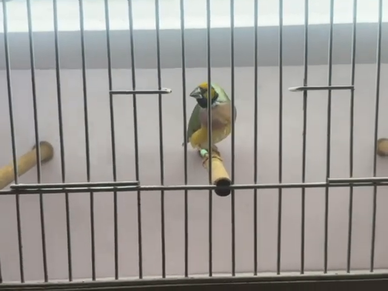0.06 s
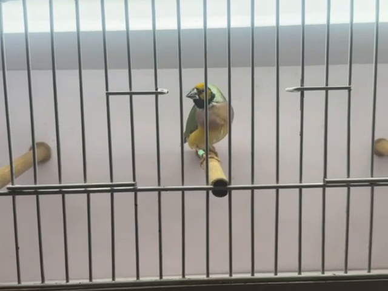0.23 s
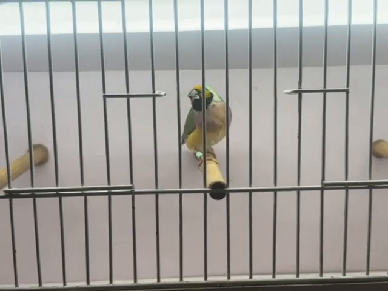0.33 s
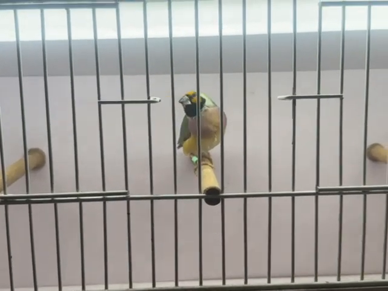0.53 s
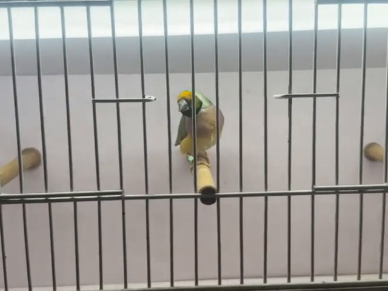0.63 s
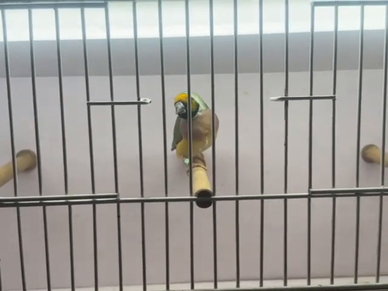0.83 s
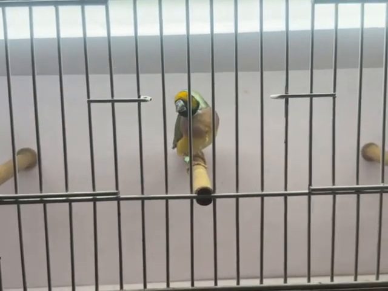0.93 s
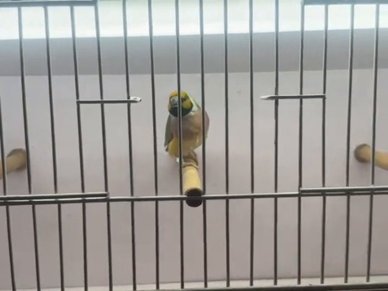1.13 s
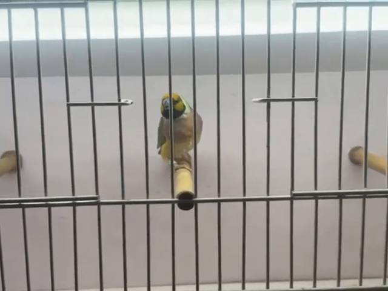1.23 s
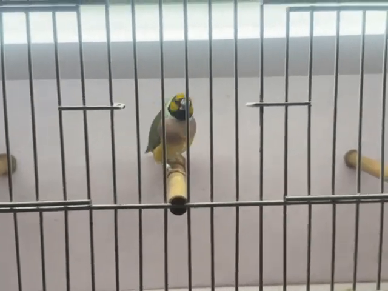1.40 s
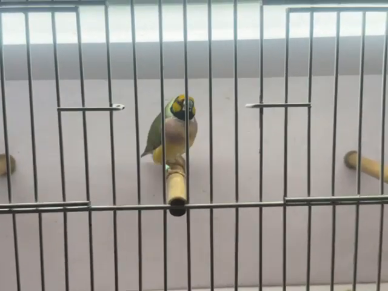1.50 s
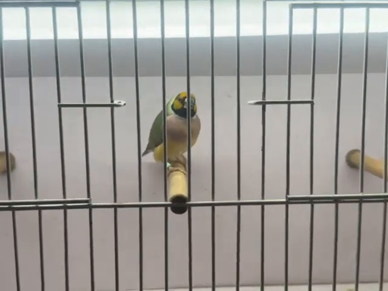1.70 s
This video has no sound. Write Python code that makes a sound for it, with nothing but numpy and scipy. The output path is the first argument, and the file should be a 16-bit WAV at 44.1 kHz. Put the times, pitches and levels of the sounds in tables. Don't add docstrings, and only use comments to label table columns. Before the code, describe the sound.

Near the microphone a finch utters two tiny notes and a bright rasping chirp; a more distant, echoing bird follows with evenly spaced down-swept whistles, while a machine drones low and uneven behind soft room air.

```python
import sys
import numpy as np
from scipy import signal
from scipy.io import wavfile
from scipy.ndimage import uniform_filter1d, minimum_filter1d

SR = 44100
rng = np.random.default_rng(int(sys.argv[2]) if len(sys.argv) > 2 else 0)


def materialize(psi):
    bounded = np.clip(np.atleast_2d(psi).T, -1, 1)
    quanta = np.round(bounded * 32767).astype(np.int16)
    wavfile.write(sys.argv[1], SR, quanta)


def gain_from_db(level_db):
    decades = np.asarray(level_db, float) / 20
    return 10 ** decades


N = 77175

# (time [s], pitch [Hz], level [dB])
INTRO_NOTE = [(0.072, 2225, -44), (0.083, 2297, -29), (0.098, 2235, -24.5), (0.108, 2450, -26),
              (0.12, 2483, -31), (0.131, 2251, -22), (0.138, 2116, -21.5), (0.143, 2050, -78)]
BRIDGE_NOTE = [(0.11, 2037, -46), (0.117, 2077, -32), (0.129, 2061, -31.5), (0.138, 2008, -34),
               (0.154, 2155, -20), (0.159, 2157, -27), (0.166, 1970, -63)]
HIGH_VOICE = [(0.136, 3762, -27.5), (0.151, 3707, -16.5), (0.173, 3680, -25), (0.189, 3720, -15.5),
              (0.203, 3988, -15), (0.225, 4122, -18.5), (0.293, 4198, -17), (0.328, 4190, -39.5),
              (.342, 4300, -75)]
LOW_VOICE = [(0.135, 2538, -40), (0.147, 2598, -28.5), (0.164, 2657, -17), (0.177, 2703, -32.5),
             (0.193, 2900, -21), (0.231, 3167, -21.5), (0.296, 3258, -19.5), (0.371, 3234, -40.5),
             (0.384, 3260, -36.5)]
INTRO_HARMONICS = [-4, -6, -25, -16, -36]
BRIDGE_HARMONICS = [3, 2, 4, -5.5, -2]
HIGH_HARMONICS = [0, -1.1, -19]
LOW_HARMONICS = [0, -1, -7.5]
# (multiple of low [-], multiple of high [-], level [dB])
SUM_TONES = [
    (1, 1, -17),
    (1, 2, -27),
    (2, 1, -23),
]
OVERTONE_SLOPES = [1, -150, -93, -29]
FLUTTER_PITCH_DIPS = [.01, .02, .1, .13]
# (time [s], share [-])
FLUTTER_EFFORT = [(.14, .3), (.165, 0.471), (.2, 0.94), (.31, 0.74), (.35, 0.14)]

# (time [s], level [dB], top pitch [Hz], accent on the first instant [dB])
FALLING_NOTES = [
    (0.442, -24.5, 5390, 2),
    (0.603, -18, 5253, 5.5),
    (0.76, -17, 5160, 1.5),
    (0.917, -20, 5390, -3),
    (1.081, -17.5, 5200, 7.5),
    (1.241, -17, 5310, 5),
    (1.408, -16.5, 5110, -5),
    (1.584, -23, 4220, -4),
]
# (frequency [Hz], level [dB])
FAR_THROAT_RESPONSE = [(2100, -21), (2300, -21), (2900, -23), (3450, -27), (3650, -4), (4500, -6),
                       (5300, -13), (6200, -20)]
# (time [s], duration [s], pitch [Hz], level [dB])
FAINT_PEEPS = [(.455, .03, 7400, -50), (.45, .015, 6300, -51), (.93, .012, 6300, -49),
               (.736, .012, 3950, -52), (.74, .02, 7500, -56), (.78, .012, 6200, -55),
               (.822, .014, 4100, -43), (.832, .012, 3800, -43), (.846, .012, 4200, -45),
               (.83, .02, 5900, -54), (.845, .015, 2250, -50), (.925, .02, 6800, -54),
               (.941, .016, 6050, -45), (1.115, .04, 7000, -55), (1.546, .032, 4230, -47),
               (1.62, .022, 2220, -49), (1.687, .01, 2900, -50), (1.548, .012, 3150, -53)]
# (time [s], level [dB])
CLAW_TICKS = [
    (0.801, -37),
    (.81, -58),
    (1.691, -68),
]

STROKE_MULTIPLES = [4, 5, 6, 7, 8, 9, 11, 12, 13, 15]
# (loaded level [dB], coasting level [dB], beat rate [Hz], loudest time [s], beat depth [0-1])
HARMONIC_BEATS = [(-22, -41, 0.23, 1.08, 0.03), (-27.5, -27.5, 0.6, 1.06, .3),
                  (-30, -36.5, 1.16, 0.4, 0.13), (-40, -35.5, 2.5, 0.096, 1), (-33, -48, 1.49, 0.796, 0.77),
                  (-47.5, -72, 0.98, 0.28, 0), (-60, -60, 0.27, 1.1, 1), (-50.5, -60, 0.88, 0.97, 1),
                  (-54.5, -65, 0.58, 0.48, 0.2), (-50, -50.5, 0.73, 0.74, 0.47)]
# (time [s], stroke rate [Hz])
STROKE_RATE = [(0, 18.4), (.2, 18.5), (.27, 19), (.33, 20.4), (.5, 20.3), (.575, 19), (.63, 18.8),
               (1.1, 18.8), (1.2, 19.2), (1.31, 19.7), (1.4, 19.1), (1.55, 19.5), (1.75, 18.6)]
# (time [s], load [0-1])
MACHINE_LOAD = [(0, 0.52), (.12, 1), (.2, 0.93), (.27, 0.48), (.34, 0.28), (.42, .03), (.5, 0.23), (.59, 0),
                (.63, 0.98), (.75, 0.92), (1.1, .97), (1.2, 0.84), (1.32, 0.4), (1.4, 0.8), (1.48, 0.58),
                (1.55, 0.38), (1.63, 0.36), (1.75, 0.4)]

# (frequency [Hz], level [dB])
AIR_SPECTRUM = [(100, -31), (170, -1), (388, -16), (1260, -15.5), (2180, -23.5), (2430, -31), (2930, -20),
                (3590, -42.5), (7000, -45.5), (9100, -77), (15400, -120)]
# (time [s], level [dB])
RUSTLE_LEVEL = [(0.0, -53), (0.13, -43.5), (0.232, -93), (0.262, -52), (0.38, -53), (0.458, -49.5),
                (1.09, -53.5), (1.218, -54), (1.466, -46.5), (1.75, -50)]
# (frequency [Hz], level [dB])
RUSTLE_SPECTRUM = [(2000, 8), (4000, -2), (6000, -0.5), (9000, -6), (11200, -10.5), (12000, -29)]
# (time [s], width [s], frequency [Hz], level [dB])
BUILDING_KNOCKS = [
    (0.81, 0.25, 760, -51),
    (1.2, 0.21, 596, -60),
    (1.66, 0.18, 540, -53),
    (1.4, 0.17, 530, -49.5),
    (1.515, 0.23, 279, -51),
    (0.37, 0.035, 290, -47),
]
# (frequency [Hz], 60 dB decay time [s])
NEAR_DECAY = [(2000, 0.18), (4000, 0.19), (7000, 0.15), (12000, 0.13)]
FAR_DECAY = [(2000, 0.12), (3000, 0.44), (4000, 0.31), (7000, 0.23)]


def evened(x):
    return x / np.sqrt(np.mean(x ** 2) + 1e-20)


def read(points, hz):
    f, value = np.transpose(points)
    return np.interp(np.log(hz + 1), np.log(f + 1), value)


def curve_at(points, t):
    return np.interp(t, *np.transpose(points))


def drift(size):
    return evened(uniform_filter1d(uniform_filter1d(rng.standard_normal(N), size), size))


def band(x, lo_hz, hi_hz):
    return signal.sosfilt(signal.butter(2, [lo_hz, min(hi_hz, .45 * SR)], "band", fs=SR, output="sos"), x)


def steep_noise(lo_hz, hi_hz):
    return evened(band(band(rng.standard_normal(N), lo_hz, hi_hz), lo_hz, hi_hz))


def syrinx_half(curve, pitch_dip, flutter):
    s, hz, db = np.transpose(curve)
    t = np.arange(N) / SR
    pitch = np.interp(t, s, hz) * (1 + .003 * drift(size=60) - pitch_dip * flutter)
    phase = 2 * np.pi * np.cumsum(pitch) / SR
    level_db = np.interp(t, s, db, -140, -140) + 3 * drift(size=200) - 11 * flutter
    return phase, gain_from_db(level_db) * np.sqrt(2)


def finch():
    out, t = np.zeros(N), np.arange(N) / SR
    flutter_hz = 100.18 * (1 + 0.11 * drift(size=400))
    flutter = (.5 + .5 * np.cos(2 * np.pi * np.cumsum(flutter_hz) / SR)) ** 4
    flutter = flutter * curve_at(FLUTTER_EFFORT, t)
    curves = (INTRO_NOTE, BRIDGE_NOTE, HIGH_VOICE, LOW_VOICE)
    tones = (INTRO_HARMONICS, BRIDGE_HARMONICS, HIGH_HARMONICS, LOW_HARMONICS)
    voices = [syrinx_half(curve, dip, flutter) for curve, dip in zip(curves, FLUTTER_PITCH_DIPS)]
    for (phase, gain), tone, slope, curve in zip(voices, tones, OVERTONE_SLOPES, curves):
        tilt_db = slope * (t - curve[0][0])
        for k, db in enumerate(tone):
            patchy_db = 4 * drift(size=500) if k else 0
            out += gain * gain_from_db(db + k * tilt_db + patchy_db) * np.sin((k + 1) * phase)
    (high, high_gain), (low, low_gain) = voices[2:]
    for m, n, db in SUM_TONES:
        sum_tone = np.sin(m * low + n * high)
        out += np.sqrt(high_gain * low_gain) * gain_from_db(db + 4 * drift(size=300)) * sum_tone
    loud = high_gain + low_gain
    out += gain_from_db(-17) * loud * steep_noise(2900, 3800)
    out += gain_from_db(-22) * voices[0][1] * steep_noise(4800, 8000)
    out += gain_from_db(-25) * loud * steep_noise(6400, 11000)
    return out + gain_from_db(-30) * loud * evened(band(rng.standard_normal(N), 7900, 9100))


def far_birds():
    top_hold_s, fall_s, end_hold_s = .006, .022, 0.013
    aim_hz, end_hz = 1900, 2213
    whistles, peeps = np.zeros(N + SR), np.zeros(N + SR)
    burr, flutter_db = .045 * drift(size=24), 2.5 * drift(size=60)
    for s, db, top_hz, accent_db in FALLING_NOTES:
        start = round(s * SR)
        glide_s = fall_s * np.log((top_hz - aim_hz) / (end_hz - aim_hz))
        t = np.arange(0, top_hold_s + glide_s + end_hold_s, 1 / SR)
        hz = aim_hz + (top_hz - aim_hz) * np.exp((top_hold_s - t) / fall_s)
        hz = np.clip(hz, end_hz, top_hz)
        roughness = (hz / top_hz) ** 2 * np.minimum(t / top_hold_s, 1)
        hz = hz * (1 + burr[start:][:len(t)] * roughness)
        effort_db = np.where(t < top_hold_s, accent_db, flutter_db[start:][:len(t)])
        shape = np.clip(np.minimum(t / .002, (t[-1] - t) / .006), 0, 1)
        gain = shape * gain_from_db(db - 10 + effort_db + read(FAR_THROAT_RESPONSE, hz))
        whistles[start:][:len(t)] += gain * np.sin(2 * np.pi * np.cumsum(hz) / SR)
    for s, length, hz, db in FAINT_PEEPS:
        start, t = round(s * SR), np.arange(0, length, 1 / SR)
        wobble = 1 + .5 * burr[start:][:len(t)]
        tone = np.sin(2 * np.pi * hz * np.cumsum(wobble) / SR)
        peeps[start:][:len(t)] += gain_from_db(db) * np.sin(np.pi * t / length) * tone
    return whistles[:N], gain_from_db(2) * peeps[:N]


def cage():
    t, noise = np.arange(N) / SR, evened(band(rng.standard_normal(N), 3400, 12400))
    return noise * sum(gain_from_db(db - 60 * np.maximum(t - s, 0) / 0.021) * (t > s) for s, db in CLAW_TICKS)


def machine_hum():
    t = np.arange(N) / SR
    turns, load = np.cumsum(curve_at(STROKE_RATE, t)) / SR, curve_at(MACHINE_LOAD, t)
    turns = turns - turns[round(.951 * SR)]
    pole, out = np.exp(-np.pi * 7 / SR), np.zeros(N)
    for k, (loaded_db, coast_db, beat_hz, peak_s, depth) in zip(STROKE_MULTIPLES, HARMONIC_BEATS):
        fuzz = signal.lfilter([1], [1, -2 * pole, pole ** 2], rng.standard_normal((2, 2 * N)))[:, N:]
        fuzz = np.array([1, 1j]) @ evened(fuzz)
        swell = 1 + depth * np.cos(2 * np.pi * beat_hz * (t - peak_s)) + gain_from_db(-17) * fuzz
        lead_turns = .25 * (k > 5)
        level = gain_from_db(coast_db + load * (loaded_db - coast_db))
        out -= level * (swell * np.exp(2j * np.pi * (k * turns + lead_turns))).real
    rumble = evened(band(band(rng.standard_normal(N), 67.6, 126.3), 49, 152))
    return out + gain_from_db(-37.5) * rumble


def air(colour, patchy_db):
    frames, hz = N // 128 + 6, np.fft.rfftfreq(512, 1 / SR)
    a, b, patches = rng.standard_normal((frames, 257, 3)).T
    patches = evened(uniform_filter1d(uniform_filter1d(patches, 10, 0), 24, 1))
    z = (a + 1j * b) * gain_from_db(read(colour, hz)[:, None] + patchy_db * patches) * (hz > 160)[:, None]
    return evened(signal.istft(z, nperseg=512, noverlap=384)[1][:N])


def background():
    t, noise = np.arange(N) / SR, rng.standard_normal(N)
    out = gain_from_db(-43) * air(AIR_SPECTRUM, patchy_db=.9)
    out += gain_from_db(curve_at(RUSTLE_LEVEL, t) + 2.5) * air(RUSTLE_SPECTRUM, patchy_db=5.5)
    for s, width, hz, db in BUILDING_KNOCKS:
        knock = evened(band(noise, 0.935 * hz, 1.088 * hz))
        out += gain_from_db(db) * np.exp(-((t - s) / width) ** 2) * knock
    return out


def room(x, decay, gap_s):
    taps = np.zeros(SR // 2)
    at = np.arange(0, len(taps) - 20, 20)
    taps[at + rng.integers(0, 20, len(at))] = rng.choice([-1., 1.], len(at))
    taps[:round(gap_s * SR)] = 0
    hz, t, z = signal.stft(taps, SR, nperseg=128)
    tail = signal.istft(z * gain_from_db(-60 * t / read(decay, hz)[:, None]), SR, nperseg=128)[1]
    return signal.fftconvolve(x, tail / np.linalg.norm(tail))[:N]


def scene():
    near, (whistles, peeps) = finch() + cage(), far_birds()
    far = whistles + gain_from_db(-6) * peeps
    odd = (np.sin(np.pi * (np.arange(N) / SR - .4) / .16) > 0) * 1.
    far_wet = room(far * odd, FAR_DECAY, 0.0032) + room(far * (1 - odd), FAR_DECAY, .002)
    mix = near + gain_from_db(1) * room(near, NEAR_DECAY, .004)
    mix += gain_from_db(-2) * far + gain_from_db(5) * far_wet + peeps
    return (mix + machine_hum() + background())[None]


def top_cut(x):
    return signal.sosfilt(signal.butter(12, 12290, fs=SR, output="sos"), x)


def record(dry):
    room_left = np.minimum(gain_from_db(-.4) / (abs(dry) + 1e-9), 1)
    held = dry * uniform_filter1d(minimum_filter1d(room_left, size=129), size=129)
    hz, t, z = signal.stft(held, SR, nperseg=1024)
    power = uniform_filter1d(uniform_filter1d(abs(z) ** 2, size=7, axis=1), size=3, axis=2)
    below = -minimum_filter1d(-power, size=37, axis=1, origin=18)
    masked = (power < below * gain_from_db(2 * -26.5)) & (hz > 4300)[:, None]
    faint = (power < gain_from_db(2 * -92)) & (hz > 10800)[:, None]
    mix = signal.istft(z * ~(masked | faint), SR, nperseg=1024)[1][:, :N]
    return top_cut(mix)


dry = scene()
out = record(dry)
materialize(out)
```